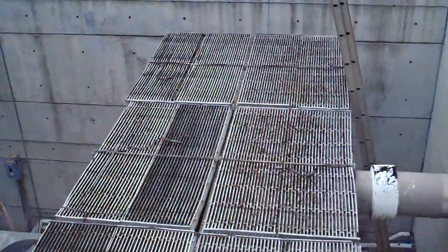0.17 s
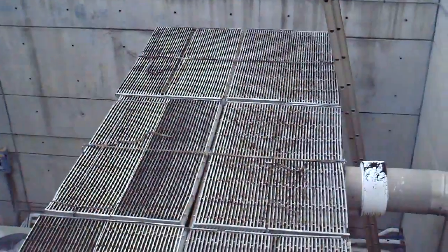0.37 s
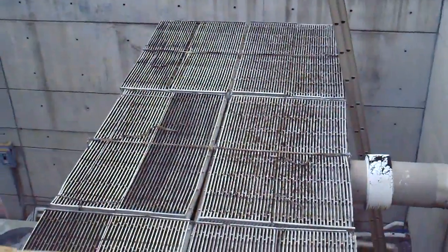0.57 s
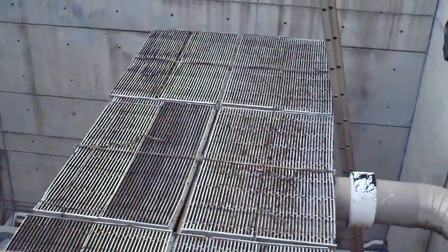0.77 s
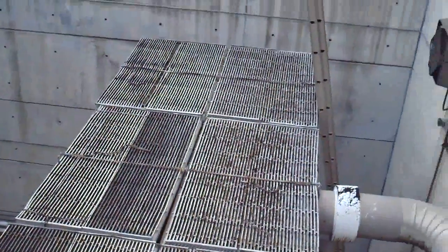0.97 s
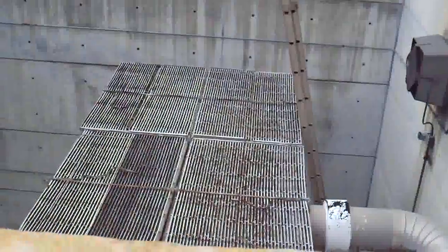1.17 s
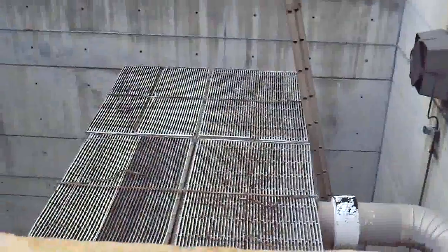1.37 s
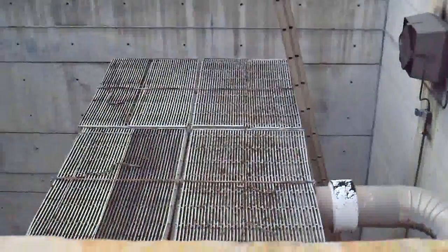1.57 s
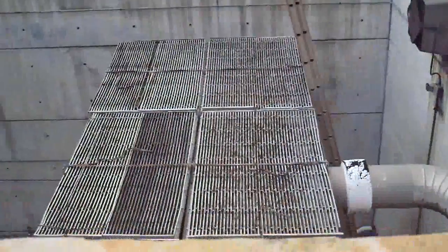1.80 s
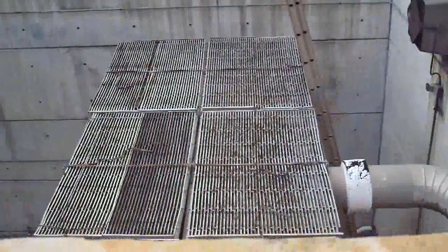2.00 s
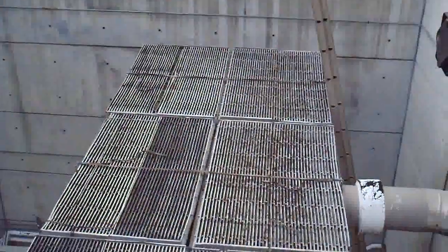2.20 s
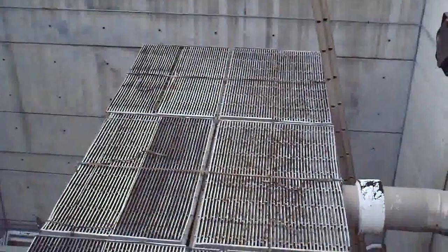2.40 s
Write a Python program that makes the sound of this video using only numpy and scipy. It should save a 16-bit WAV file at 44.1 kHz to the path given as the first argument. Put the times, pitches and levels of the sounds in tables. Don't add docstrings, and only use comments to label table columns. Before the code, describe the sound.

After a near-silent instant and a hard electrical pop, cooling tower fans whine and rush without pause outdoors between concrete walls; a handheld camera microphone adds small scrapes and two sharp plastic snaps in the later part.

```python
import sys
import numpy as np
from scipy import signal
from scipy.fft import rfft, irfft
from scipy.io import wavfile
from scipy.ndimage import uniform_filter1d

SR = 44100
rng = np.random.default_rng(int(sys.argv[2]) if len(sys.argv) > 2 else 0)


def wav_record(signal):
    frames = np.transpose(np.atleast_2d(signal))
    bounded = np.clip(frames, -1, 1)
    quanta = np.round(bounded * 32767).astype(np.int16)
    wavfile.write(sys.argv[1], SR, quanta)


def boost_factor(decibels):
    exponent = np.asarray(decibels, float) / 20
    return 10 ** exponent


N = 108045
T = np.arange(N) / SR
HZ = np.arange(N // 2 + 1) * SR / N


def walk(rate):
    k = max(int(SR / rate), 2)
    steps = np.repeat(rng.standard_normal(N // k + 2), k)
    return 1.43 * uniform_filter1d(uniform_filter1d(steps, k), k)[:N]


def curve(table, count):
    table = np.array(table)
    return np.interp(T, table[:, 0], table[:, count])


def at_level(x, db):
    return x * boost_factor(db) / np.sqrt(np.mean(x ** 2))


def tone(hz, db, wander_db, rate, slip):
    level = np.sqrt(2) * boost_factor(db + wander_db * walk(rate))
    return level * np.sin(2 * np.pi * (hz * T + rng.random()) + slip * walk(rate))


def shaped(gain, db):
    return at_level(irfft(rfft(rng.standard_normal(N)) * gain, N), db)


def rush(shape, db, swell_db, flicker_db):
    shape = np.array(shape)
    octave = np.log2(HZ + 1)
    corners = np.log2(shape[:, 0])
    swell = walk(3.6)
    source = rfft(rng.standard_normal(N)) * boost_factor(np.interp(octave, corners, shape[:, 1]))
    out = 0
    for centre in np.arange(corners[0], corners[-1] + .5, .5):
        band = np.cos(np.pi * np.clip(octave - centre, -.5, .5)) ** 2
        out = out + irfft(source * band, N) * boost_factor(swell_db * swell + flicker_db * walk(8.81))
    return at_level(out, db)


# (frequency [Hz], level [dB])
AIR_COLOUR = [(12, -29), (20, -13.5), (152, -7), (208, -3), (530, -10), (569, -11), (824, -7.5),
              (1000, -11.5), (1350, -15.5), (1760, -22), (2970, -120)]
WATER_COLOUR = [(1440, -6), (2450, -0.5), (2500, 1), (3290, -0.5), (3550, -5), (4170, -8.5), (4810, -7),
                (5440, -13), (5650, -35), (7340, -52), (12400, -120)]
SPRAY_COLOUR = [(3680, -34), (6250, -0.5), (7550, -9.5), (10200, -2), (15700, -20)]


def air_and_water():
    out = rush(AIR_COLOUR, -36.5, swell_db=0.2, flicker_db=1.2)
    out = out + rush(WATER_COLOUR, -41, swell_db=0.42, flicker_db=0.54)
    out = out + rush(SPRAY_COLOUR, -48, swell_db=0.14, flicker_db=0.37)
    return irfft(rfft(out) * (HZ < 15750), N)


# (time [s], rise [s], hold [s], sag [s])
SUPPLY_JUMPS = [
    (.06193, .00004, .0015, .0068),
    (.06625, .00025, .0006, .0046),
    (.0698, .0004, .0006, .0014),
]


def switch_on():
    rail = .865
    out = np.zeros(N)
    for at, rise, hold, sag in SUPPLY_JUMPS:
        share = np.clip((T - at) / rise, 0, 1)
        jump = rail * np.exp(-np.maximum(T - at - rise - hold, 0) / sag)
        out = (1 - share) * out + share * jump
    since = np.maximum(T - .0735, 0)
    undershoot = .105 * (1 - np.exp(-since / .008)) * np.exp(-since / .082)
    last_bump = .1 * np.exp(-((T - .0741) / .0006) ** 2)
    return out + last_bump - undershoot


# (time [s], half length [s], level [dB], centre [Hz], width [Hz])
SCRAPES = [
    (.147, .002, -42, 6000, 4000),
    (.275, .025, -47, 5500, 2500),
    (1.725, .002, -50, 12000, 4000),
    (1.8675, .003, -43, 5500, 3000),
    (1.908, .0015, -56, 14500, 1200),
    (2.185, .002, -50, 13500, 3500),
]


def scrapes():
    out = np.zeros(N)
    for at, half, db, hz, width in SCRAPES:
        noise = shaped(1 / (1 + ((HZ - hz) / width) ** 2), db)
        out += noise * np.exp(-((T - at) / half) ** 2)
    return out


# (time [s], peak level [dB], brightness [dB per octave])
SHELL_TICKS = [
    (1.5133, -4.5, .5),
    (1.8655, -23, .5),
    (1.8688, -21, 1.5),
    (1.9646, -5.5, -1.2),
]
# (frequency [Hz], level [dB], 60 dB decay [s])
SHELL_MODES = [(2430, -6, .008), (3000, -5, .004), (3850, 0, .0085), (4520, -12, .012), (5580, -5, .015),
               (7050, -10, .009), (7750, -10, .007), (8500, -13, .005), (9200, -13, .005),
               (11050, -8, .006), (12850, -22, .008), (14400, -32, .008)]


def ticks():
    length, hold_s, release_s = 2000, .0017, .0007
    out = np.zeros(N + length)
    t = np.arange(length) / SR
    onset = 1 - np.exp(-t / .00008)
    damping = .2 + .8 * np.exp(-np.maximum(t - hold_s, 0) / release_s)
    for at, db, bright_db in SHELL_TICKS:
        ring = np.zeros(length)
        for hz, mode_db, t60 in SHELL_MODES:
            level_chance, pitch_chance = rng.standard_normal(2)
            level = boost_factor(mode_db + .8 * level_chance + bright_db * np.log2(hz / 3870))
            decay = np.exp(-np.log(1000) * t / t60)
            ring += level * decay * np.sin(2 * np.pi * hz * (1 + .004 * pitch_chance) * t)
        ring = -ring * onset * damping
        i = int(at * SR)
        out[i:i + length] += boost_factor(db) * ring / np.abs(ring).max()
    return out[:N]


# (frequency [Hz], level under the main tone [dB])
MOTOR_TONES = [(5951, 0), (6025, -8), (5872, -13), (6151, -18), (6080, -19)]
# (start [s], end [s], level [dB])
MOTOR_SPELLS = [(.06, .15, -47), (.275, .47, -46), (.52, .58, -46), (.62, .83, -48), (.87, .95, -55),
                (.98, 1.36, -49), (1.38, 1.55, -46), (1.59, 1.63, -54), (1.67, 1.76, -50),
                (1.98, 2.095, -50), (2.13, 2.3, -57), (2.38, 2.5, -56)]


def motor():
    spells = sum(boost_factor(db) * ((T > start) & (T < end)) for start, end, db in MOTOR_SPELLS)
    edge_s, base_db = .04, -59
    level = 20 * np.log10(uniform_filter1d(spells + boost_factor(base_db), int(edge_s * SR)))
    out = 0
    for hz, db in MOTOR_TONES[1:]:
        out = out + tone(hz, .5 * level - 26.5 + db, 2.7, 6.84, 0.37)
    out = out + tone(MOTOR_TONES[0][0], level - 2.6, 2.2, 16, .4)
    whistle_db = -69 + 11 * np.clip((T - 1.68) / 0.11, 0, 1)
    return out + tone(6764, whistle_db - .6, 1.4, 14, .5)


# (time [s], level [dB])
TOOTH_WHINE = [(0.1, -33.5), (0.23, -27), (0.26, -31.5), (0.47, -28), (0.52, -33.5), (0.55, -26.5),
               (0.68, -30), (1.11, -30), (1.15, -25), (1.3, -38.5), (1.34, -35), (1.36, -38), (1.45, -38),
               (1.5, -35), (1.7, -32.5), (1.79, -41), (1.81, -29.5), (2.45, -34)]
# (time [s], upper level [dB], near level [dB])
SIDEBAND_DRIFT = [(.1, -40, -35), (.5, -41, -34.5), (.9, -37, -36), (1.0, -33.5, -38), (1.35, -35.5, -47),
                  (1.55, -30, -39), (1.8, -33.5, -43.5), (2.45, -33.5, -37.5)]
# (frequency [Hz], level [dB])
SHAFT_SIDEBANDS = [(1432, -55), (1469, -49), (1500, -49), (1512, -50), (1565, -50), (1587, -48),
                   (1623, -42), (1654, -47), (1671, -42), (1794, -47), (1826, -53), (1856, -47),
                   (1893, -48), (1710, -49)]
# (frequency [Hz], level [dB])
WEAK_TONES = [(339, -55), (2030, -58), (2116, -52), (2175, -55), (2261, -57), (2290, -57), (2309, -55),
              (2799, -61), (3176, -63)]
# (time [s], low gear level [dB], second gear level [dB])
CAMERA_TURN = [(0.1, -39, -60), (0.13, -45.5, -54), (0.5, -42, -49), (0.52, -46, -49), (1.14, -44.5, -51),
               (1.17, -41, -60), (1.46, -44.5, -48), (1.51, -60, -47), (1.53, -60, -51), (2.11, -65, -46),
               (2.23, -49, -57), (2.45, -50, -50)]
# (frequency [Hz], width [Hz], level [dB])
CASING_MODES = [(1500, 98, -46.5), (1602, 87, -42.5), (1715, 120, -40.5), (1790, 300, -40),
                (2060, 270, -55), (2120, 76, -45), (2170, 28, -52.5), (2305, 124, -45.5)]


def gearbox():
    out = tone(1690.4, curve(TOOTH_WHINE, 1), 1.65, 16, 0.34)
    out = out + tone(1757.8, curve(SIDEBAND_DRIFT, 1), 1.1, 12.25, 0.33)
    out = out + tone(1726.8, curve(SIDEBAND_DRIFT, 2), 1.5, 10, .5)
    for hz, db in SHAFT_SIDEBANDS:
        out = out + tone(hz, db - .6, 1.75, 6.22, 0.59)
    for hz, db in WEAK_TONES:
        out = out + tone(hz, db - 1.1, 3, 6, .8)
    out = out + tone(812, curve(CAMERA_TURN, 1) - .4, .9, 10, .6)
    out = out + tone(1187, curve(CAMERA_TURN, 2) - 1.1, 2.6, 7.6, 0.53)
    for hz, width, db in CASING_MODES:
        out = out + shaped(1 / (1 + (2 * (HZ - hz) / width) ** 2), db)
    return out


def scene():
    tower = air_and_water() + gearbox() + motor()
    handling = ticks() + scrapes()
    return (tower + handling)[None]


def band_limit(x):
    return signal.sosfilt(signal.butter(12, 16680, fs=SR, output="sos"), x)


def record(dry):
    opening = np.clip((T - 0.072) / 0.0039, 0, 1)
    idle_fade = np.clip((T - 0.04) / 0.007, 0, 1) * (1 - opening)
    hiss = boost_factor(-54.5) * rng.standard_normal(N) * idle_fade
    top_cut = signal.cheby2(12, 40, 16750, fs=SR, output="sos")
    mix = signal.sosfiltfilt(top_cut, dry * opening + hiss + switch_on())
    return band_limit(mix)


dry = scene()
out = record(dry)
wav_record(out)
```